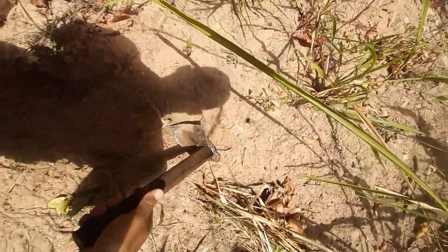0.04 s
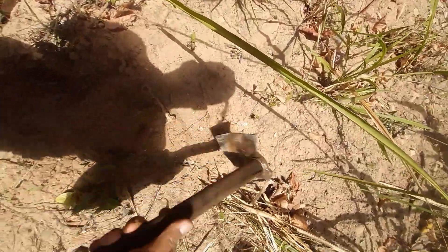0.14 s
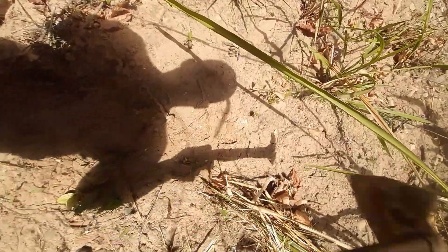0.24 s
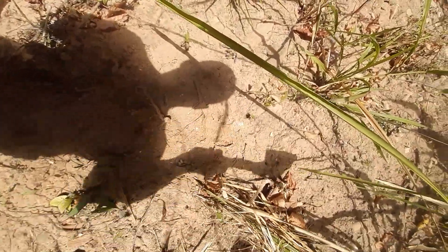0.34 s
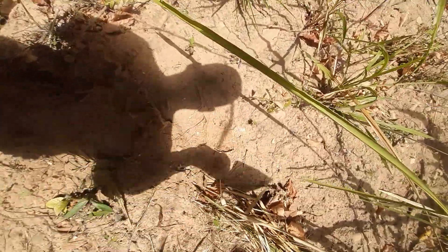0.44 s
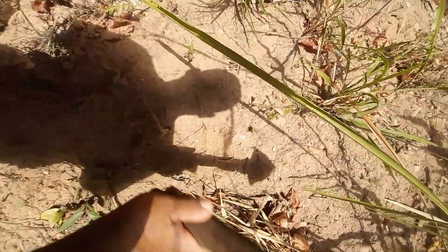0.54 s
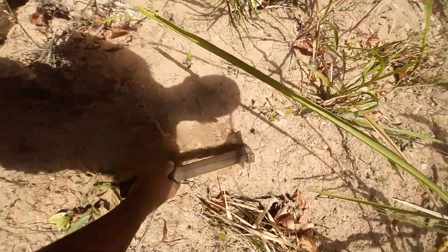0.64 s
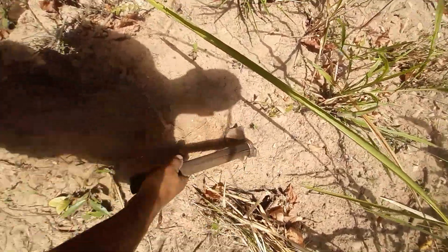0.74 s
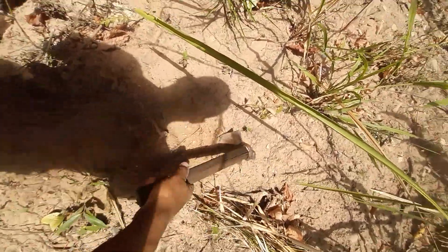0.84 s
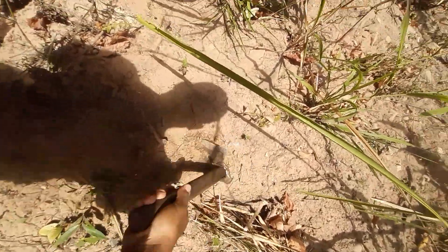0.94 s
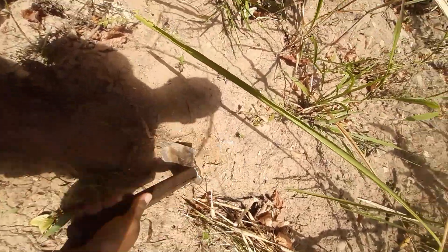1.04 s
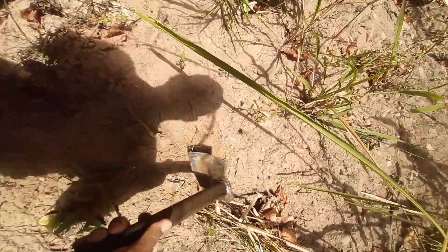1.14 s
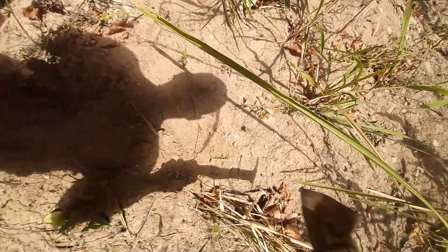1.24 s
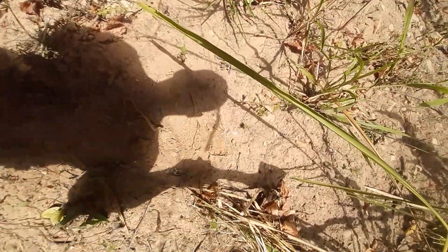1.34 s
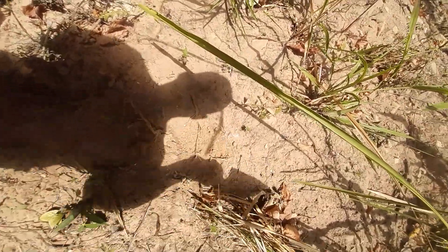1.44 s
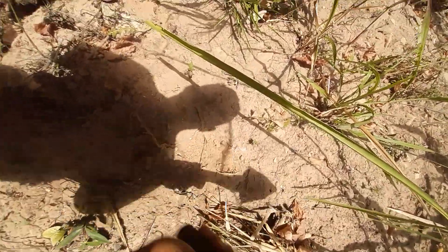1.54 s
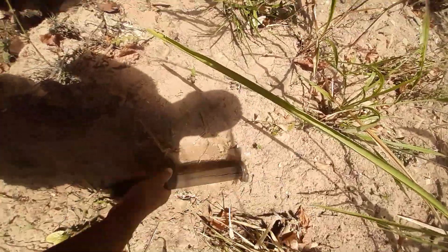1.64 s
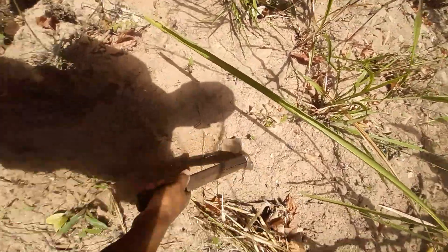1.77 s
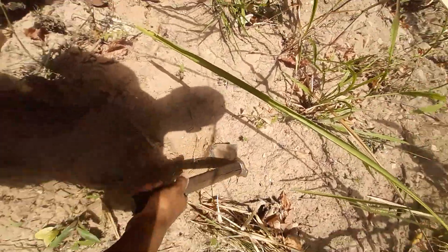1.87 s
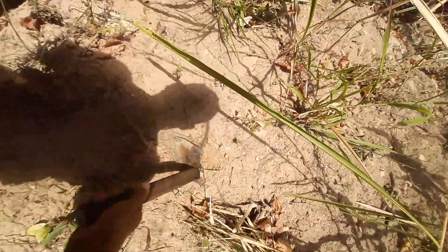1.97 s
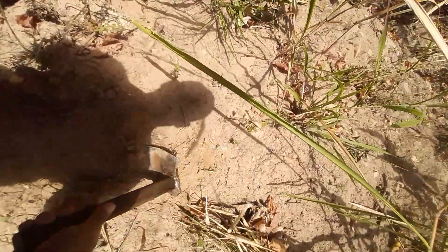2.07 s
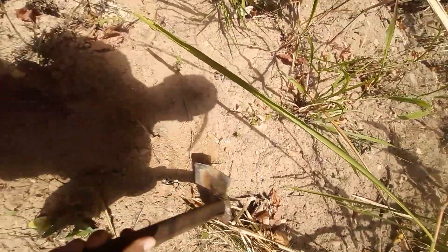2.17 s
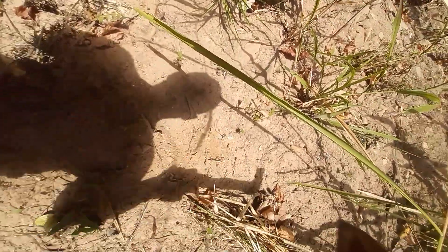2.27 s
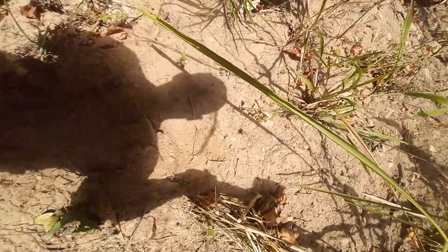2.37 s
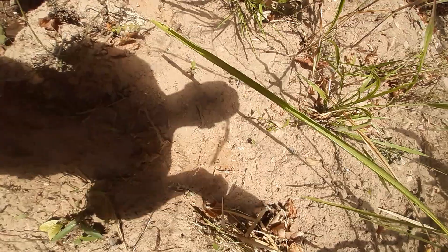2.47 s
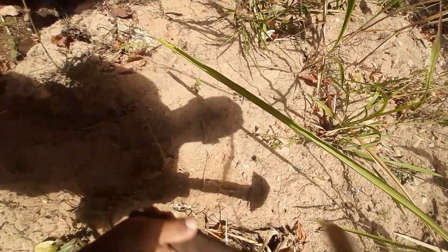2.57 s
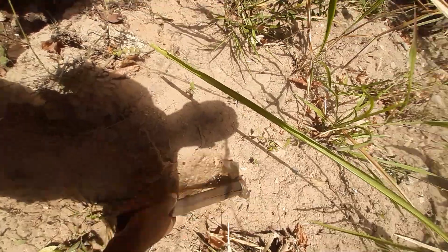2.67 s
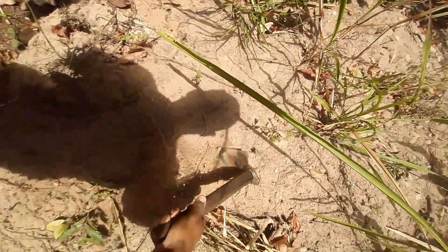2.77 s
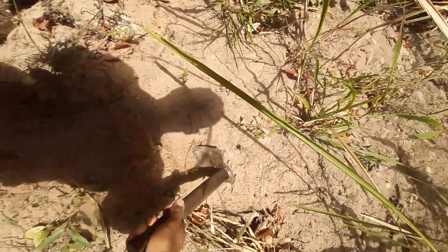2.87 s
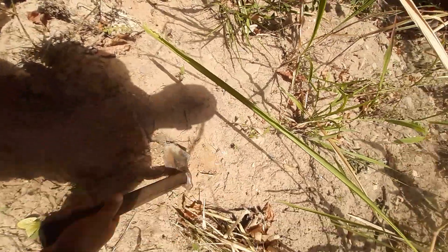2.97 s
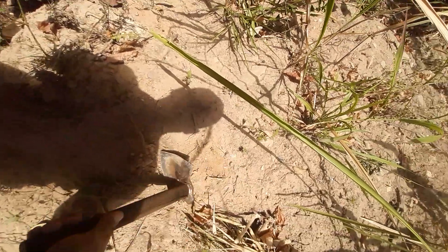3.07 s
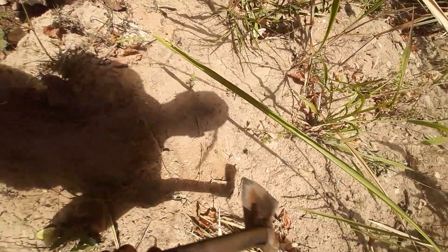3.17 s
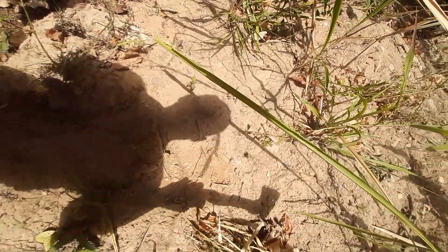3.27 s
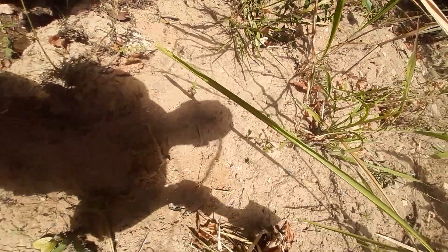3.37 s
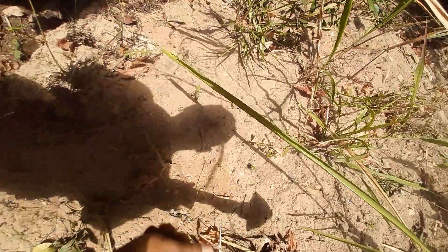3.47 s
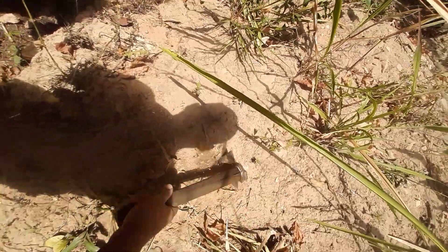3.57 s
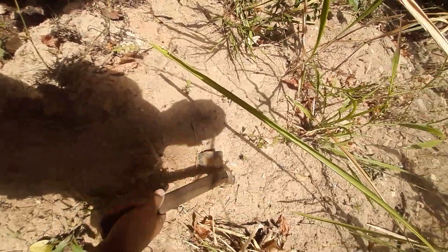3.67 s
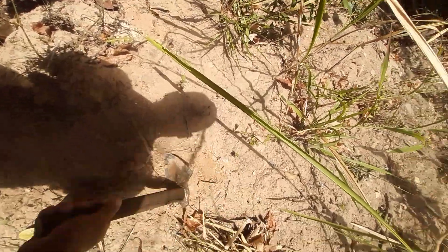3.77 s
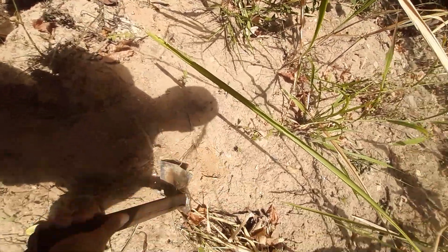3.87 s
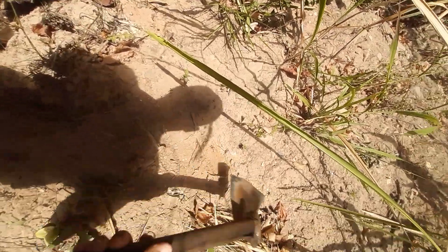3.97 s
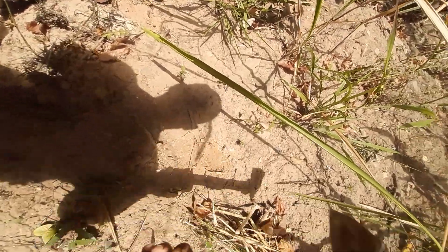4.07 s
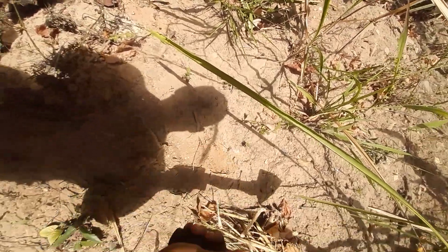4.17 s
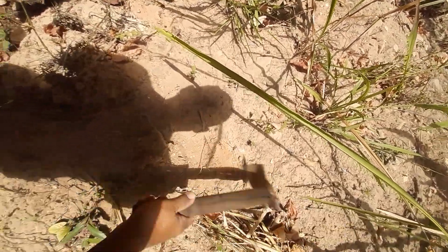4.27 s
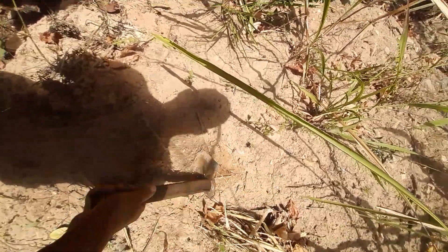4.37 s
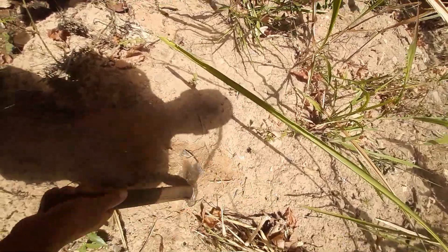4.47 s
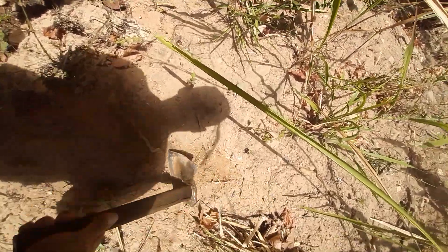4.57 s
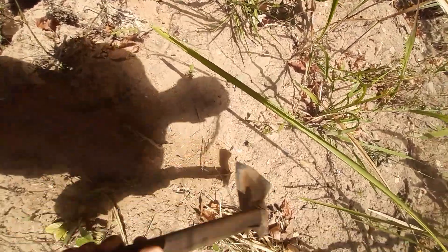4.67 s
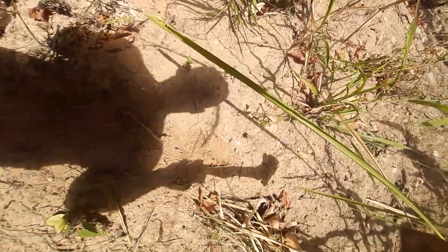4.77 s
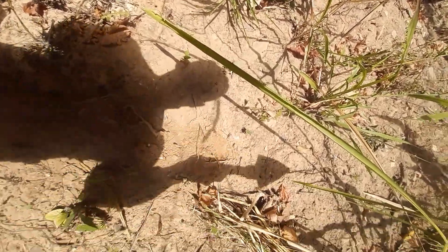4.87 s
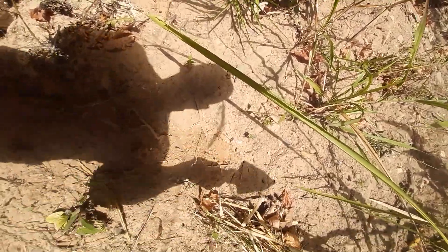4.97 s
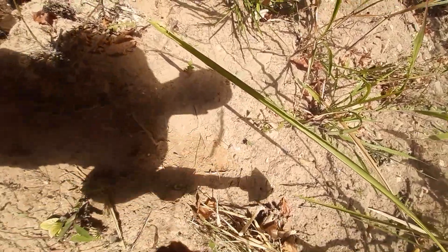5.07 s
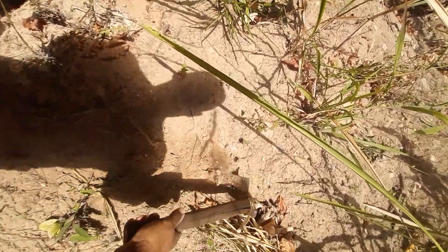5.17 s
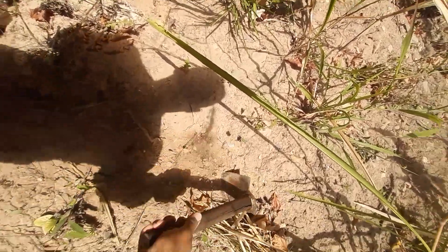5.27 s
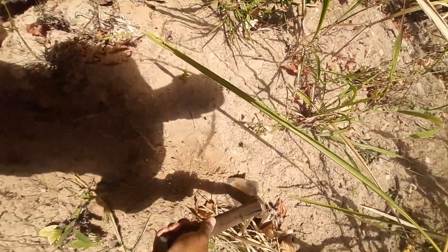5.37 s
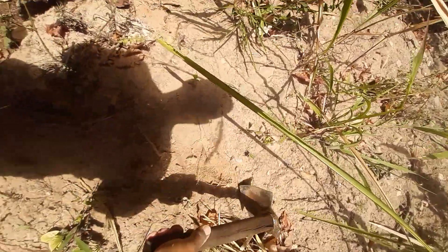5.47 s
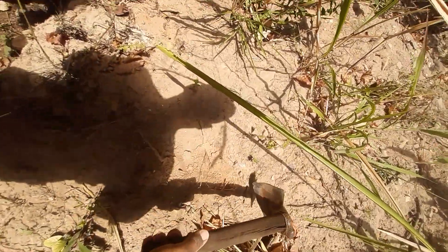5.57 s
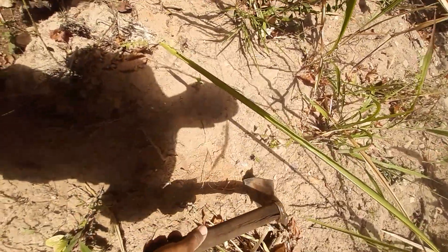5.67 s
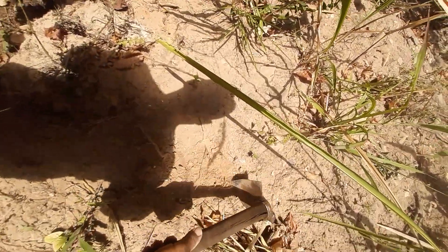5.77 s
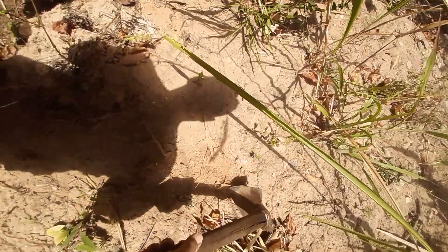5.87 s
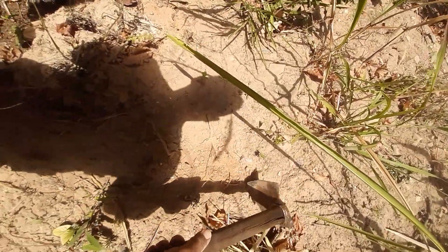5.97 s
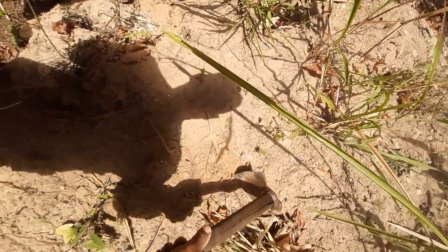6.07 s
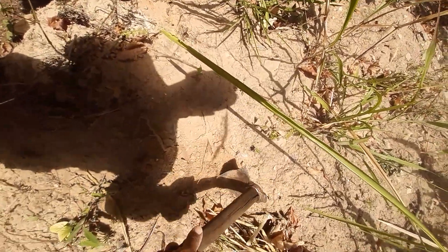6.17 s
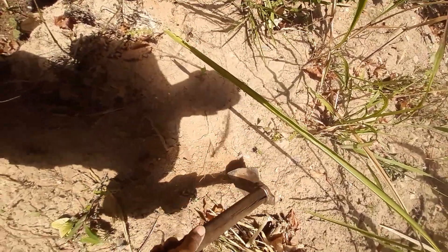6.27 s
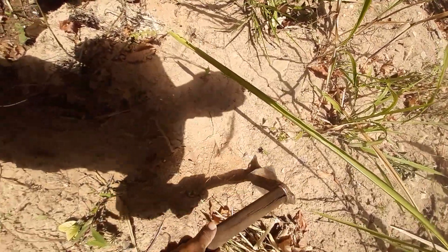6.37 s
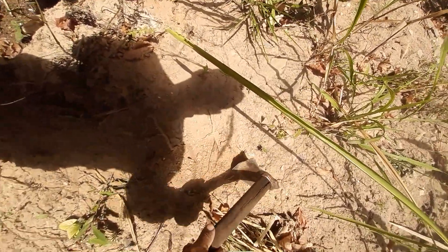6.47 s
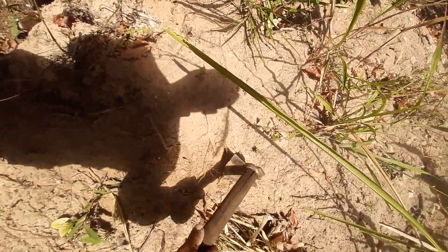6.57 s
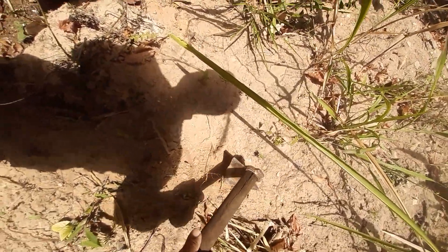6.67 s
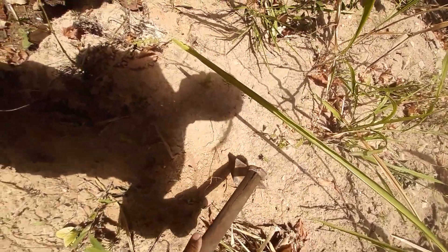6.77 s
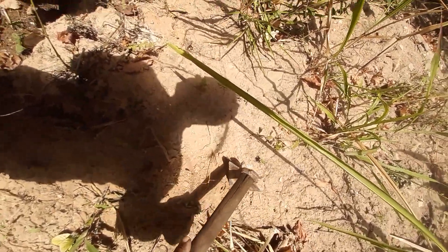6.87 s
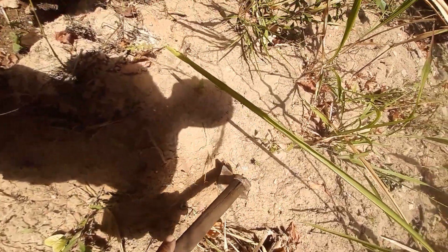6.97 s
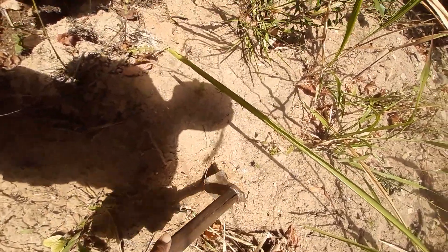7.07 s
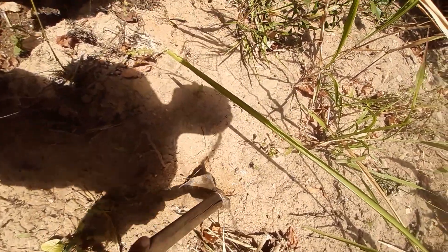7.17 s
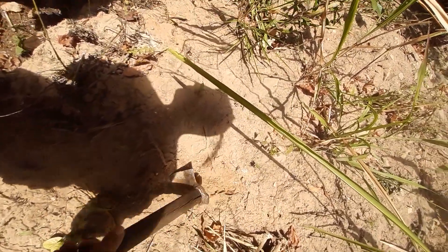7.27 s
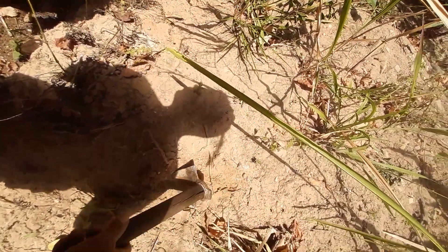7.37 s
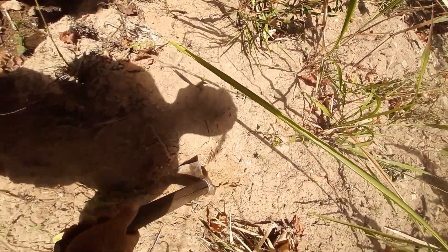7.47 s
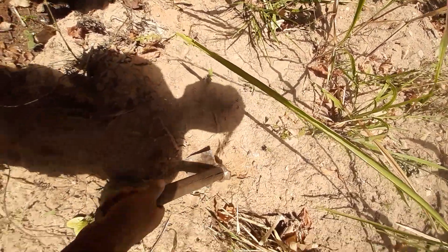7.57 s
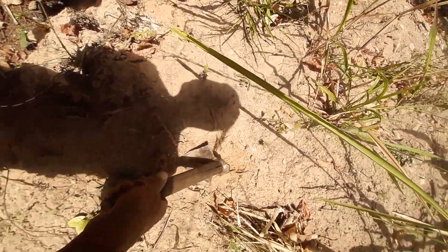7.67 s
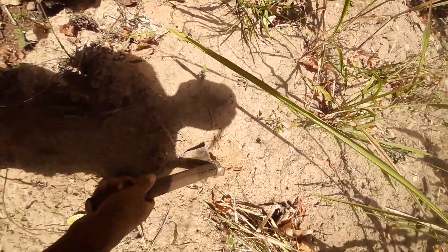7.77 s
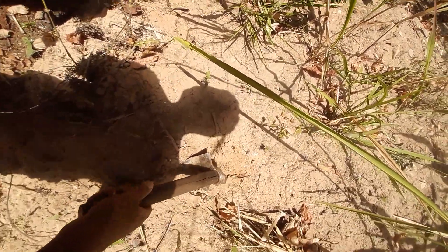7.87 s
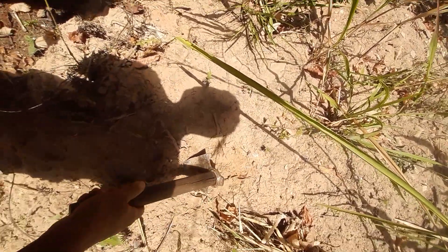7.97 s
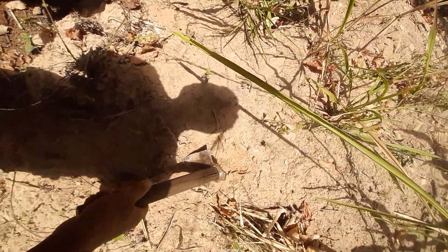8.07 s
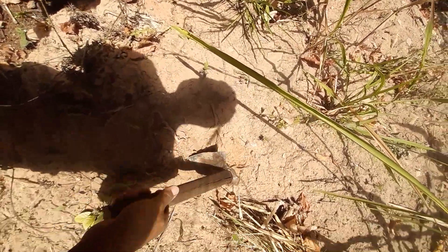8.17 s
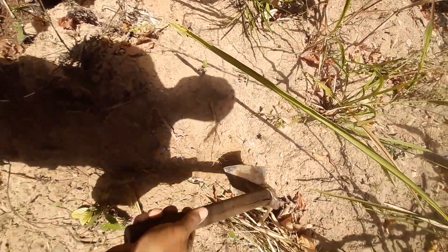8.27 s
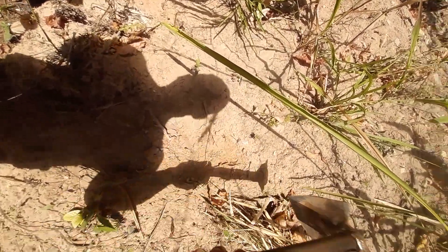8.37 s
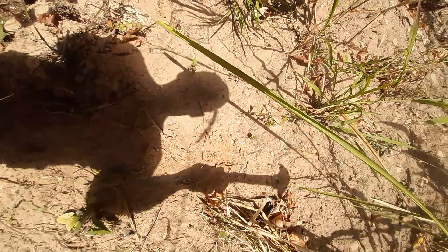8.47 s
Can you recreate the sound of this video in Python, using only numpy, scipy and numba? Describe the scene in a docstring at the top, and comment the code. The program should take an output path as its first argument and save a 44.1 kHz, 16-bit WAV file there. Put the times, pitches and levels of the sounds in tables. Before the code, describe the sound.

A steel hand hoe chops dry gravelly ground about once every half second, blade clinking and grit crunching, with loose stones pattering down outdoors.

```python
"""A steel hand hoe strikes almost at once over a faint outdoor murmur and low rumble, then chops, scrapes and taps on
dry gravelly ground. Each blow crunches grit (clicky noise), knocks soil (low noise) and rings the blade (decaying modes
that the soil damps). Drags feed the same layers unevenly; stones clack and thrown earth patters down between blows.
Low thuds are short decaying sines. Later, short puffs of air buffet the left port of the two-port microphone."""
import sys
import numpy as np
from scipy import signal
from scipy.fft import rfft, irfft
from scipy.io import wavfile
from scipy.ndimage import uniform_filter1d
from numba import njit

SR = 44100
rng = np.random.default_rng(int(sys.argv[2]) if len(sys.argv) > 2 else 0)


def wav_record(signal):
    """Record a signal, one row per channel, as 16-bit PCM in the file named by sys.argv[1]."""
    frames = np.transpose(np.atleast_2d(signal))
    bounded = np.clip(frames, -1, 1)
    # unit amplitude maps onto the largest positive 16-bit level
    quanta = np.round(bounded * 32767).astype(np.int16)
    wavfile.write(sys.argv[1], SR, quanta)


N = 375732


def undb(db):
    """Amplitude ratio of a level in dB."""
    return 10 ** (np.asarray(db) / 20)


def unit(x):
    """Scale to rms 1."""
    return x / np.sqrt(np.mean(x ** 2))


def sides(pan_db):
    """Left and right gains with the given left minus right dB; their mean is 1."""
    share = undb(pan_db) / (1 + undb(pan_db))
    return 2 * np.array([[share], [1 - share]])


def colour(x, table):
    """Causal filter with the given (Hz, dB) shape, from the cepstrum of the log gain."""
    size = 2048
    hz, db = np.transpose(table)
    bin_hz = np.arange(size // 2 + 1) * SR / size
    log_gain = np.interp(np.log(bin_hz + 1), np.log(hz), db) * np.log(10) / 20
    cepstrum = irfft(log_gain)
    # fold the cepstrum onto positive time: minimum phase
    cepstrum[1:size // 2] *= 2
    cepstrum[size // 2 + 1:] = 0
    return signal.oaconvolve(x, irfft(np.exp(rfft(cepstrum))))[:N]


def curves(table):
    """Interpolate each column over time; the first column is in seconds."""
    s, *columns = np.transpose(table)
    return [np.interp(np.arange(N) / SR, s, column) for column in columns]


def walk(rate_hz):
    """Random levels held 1 / rate_hz s and slewed twice; spread near 1."""
    hold = int(SR / rate_hz)
    steps = np.repeat(rng.standard_normal(N // hold + 1), hold)
    return 1.65 * uniform_filter1d(uniform_filter1d(steps, hold), hold)[:N]


def grains(table, share, scatter_db, own=0.):
    """Noise broken into uneven coloured clicks, a part (own) different at each port; rms 1."""
    size_db = scatter_db * np.minimum(rng.exponential(size=N), 4.5)
    size = (rng.random(N) < share) * undb(size_db)
    both, left = size * rng.standard_normal((2, N))
    own = np.clip(own, 0, 1)
    left_clicks = np.sqrt(1 - own) * both + np.sqrt(own) * left
    return np.array([unit(colour(x, table)) for x in (left_clicks, both)])


@njit
def ring(x, turn, loss, grip):
    """One mode as a rotating decaying phasor, with a loss that follows the grip."""
    y, z = np.empty(len(x)), 0j
    for i in range(len(x)):
        z = z * turn * (1 - loss * grip[i]) + x[i]
        y[i] = z.imag
    return y


# Murmur spectrum. Each row: frequency in Hz, density in dB per Hz.
AIR_SPECTRUM = [(71, -76), (120, -55), (223, -12), (350, -4.5), (663, -4.5), (1210, -7.5), (1390, -12),
                (1900, -8), (3450, -13), (6600, -21), (7700, -31), (15200, -31.5), (16500, -51)]
# Port balance of the murmur. Each row: frequency in Hz, left minus right in dB.
AIR_BALANCE = [(100, -5), (700, -2), (3000, -5.5), (15000, 14)]
AIR_DB = -54.5


def air():
    """Outdoor murmur: bass alike at both ports, treble unrelated; it swells a little."""
    shared = colour(rng.standard_normal(N), [(300, 3.5), (700, -11), (1500, -22.5)])
    balance_hz, balance_db = np.transpose(AIR_BALANCE)
    out = []
    for half in (.5, -.5):
        own = colour(rng.standard_normal(N), [(300, -6.5), (700, 1.5), (1500, 0.0)])
        spectrum = [(hz, db + half * np.interp(np.log(hz), np.log(balance_hz), balance_db))
                    for hz, db in AIR_SPECTRUM]
        out.append(colour(shared + own, spectrum))
    out = np.array(out)
    return out / np.std(out.mean(0)) * undb(AIR_DB + 1.6 * walk(3))


# Rumble spectrum. Each row: frequency in Hz, density in dB per Hz.
RUMBLE_SPECTRUM = [(25, -17), (45, -2), (60, 18), (75, -5), (120, -20)]
# Rumble swells. Each row: peak time in seconds, level in dB.
SWELLS = [(0.0, -67), (0.7, -63), (1.37, -65), (1.76, -66), (2.69, -52), (3.62, -60), (4.03, -79),
          (4.36, -62), (4.8, -53), (5.3, -61), (5.6, -67), (6.0, -72), (6.75, -60), (7.05, -61),
          (7.38, -69.5), (8.07, -68), (8.45, -59)]
SWELL_SIGMA_S, RUMBLE_FLOOR_DB = 0.052, -77


def rumble():
    """Wind on the microphone: faint low noise at both ports with bell-shaped swells."""
    t = np.arange(N) / SR
    swells = sum(undb(db) * np.exp(-((t - s) / SWELL_SIGMA_S) ** 2 / 2) for s, db in SWELLS)
    noise = unit(colour(rng.standard_normal(N), RUMBLE_SPECTRUM))
    return noise * (undb(RUMBLE_FLOOR_DB) + swells) * sides(-5.0)


# Blade meets ground. Each row: start in seconds, crunch in dB, then relative to it soil knock in dB,
# low blade ring in dB, high blade ring in dB; push in ms.
BLOWS = [(0.0177, -33, -29, 8, 1.5, 4.8), (0.644, -19.5, -0.5, 7.5, -9, 7.7),
         (0.897, -26.5, -22, 10.5, -11, 1.6), (0.9114, -36, -1, -17, 2.5, 4),
         (0.932, -35.5, -19, 13, -20, 1.7), (1.6587, -18.5, -3, 8, 2, 8.4),
         (1.73, -32, -3.5, 13, -19, 0.91), (1.8699, -21.5, -39, -31, -6.5, 0.54),
         (1.901, -27, -30, -9, 1, 1.2), (1.917, -30.5, -15, 2.5, -3, 5.9), (1.935, -36.5, -4.5, -2, 1, 4.1),
         (2.0097, -16.5, -11.5, 0, -11, 4.3), (2.659, -19, 2, 1, -14, 2.3),
         (2.978, -24.5, -2, -2.5, -8.5, 2.5), (3.119, -39, -12, -6, -13, 8.6),
         (3.5733, -21, -0.5, 8.5, -3, 0.87), (3.775, -32.5, 8.5, -13, 0, 2.4),
         (4.3241, -30.5, -1, 4, 1, 23), (4.3346, -23.5, -16, 17.5, 3, 0.42),
         (4.3483, -20.5, -10, 2, 0.5, 5.5), (4.403, -22, -17, -12, -6.5, 1.6),
         (4.426, -30, -4, -19, -13, 1.6), (4.449, -44.5, 8, -18, 10.5, 20), (4.4746, -43, 6.5, 7, 3, 16),
         (4.5111, -25.5, 2, -14, 3.5, 3.1), (5.1617, -17, 3, 7, -3, 4.8), (5.7471, -21.5, 3, 0, 4, 1.85),
         (5.911, -50, -19, -27, 16, 3.8), (6.1154, -29.5, 9, 12, 6.5, 9.7), (6.148, -27, 6, 7, -2, 1.9),
         (6.1651, -29.5, -16, 0, -27, 4.5), (6.485, -21.5, 2, 9.5, -2.5, 9.9),
         (6.5182, -16.5, -4, 5, -12.5, 3.4), (6.593, -43, -5, 16.5, -8, 15), (6.658, -40.5, -30, 8, 3, 3.2),
         (6.8108, -38, 6, 12.5, -14, 1.9), (6.8552, -40, -9, 7, -30, 1.4),
         (6.9145, -20.5, -13, 5, -14, 2.5), (6.929, -31.5, -29, 4, -24, 2.9), (6.977, -38, -6, 5, -26, 18),
         (7.002, -29, -10, 0.5, -32, 1.3), (7.3044, -44, -16, -17, -1, 13)]
# Landing stones and clods. Each row: start in seconds, level in dB, clack in Hz, treble in dB before
# the offset below, left minus right in dB.
STONES = [(0.0733, -22, 3800, -9, -6), (0.0925, -25, 3830, -20, -6), (0.131, -30.5, 4240, -10, -14),
          (0.1737, -22.5, 4100, -7, -9), (0.3333, -30, 4100, -6, -13), (0.3626, -40, 4270, -5, -8.0),
          (0.6968, -33, 1580, -18, -8), (0.7105, -18, 1570, -12, -13), (0.7774, -30, 5780, -18, -10.5),
          (0.8077, -30, 4370, -7, -7), (0.815, -28, 4850, -19, -14), (0.9666, -20.5, 1550, -16, -15),
          (0.9804, -20, 4530, -7, -10.0), (1.059, -12.5, 4700, -30, -4), (1.1184, -24.5, 6550, -15, -11.5),
          (1.1553, -25, 4610, -15, -9), (1.183, -30, 2580, -10, -11.0), (1.2081, -32, 2410, -21, -11.0),
          (1.2645, -38, 6550, -9, -9.0), (1.4245, -29, 4710, -6, -8), (1.614, -41, 2620, -7, -10.0),
          (1.684, -32, 1540, -18, -12.0), (1.754, -24.5, 1670, -10, -10), (1.7722, -37, 2740, -9, -12.5),
          (1.8404, -27.5, 6170, -7, -7), (1.8492, -22, 4980, -3, 2), (1.9804, -50, 4130, -4, -6.0),
          (2.1301, -37, 4680, 3, -12.5), (2.147, -35, 4650, -8, -12), (2.206, -17, 5210, -10, -2),
          (2.2241, -14.5, 5100, -7, -4), (2.369, -30, 2570, -7, -10), (2.4803, -23.5, 4250, -21, -8),
          (2.5955, -23, 2410, -34, 4), (2.775, -37, 2490, -10, -7.5), (2.8344, -45, 2550, -8, -8.0),
          (3.0614, -29, 4200, -6, -10.5), (3.1404, -25.5, 4130, -7, -11.5), (3.1622, -29, 4520, -4, -7),
          (3.2973, -33, 2490, -22, -5), (3.3508, -31, 3790, -9, -7), (3.4076, -27, 4030, -8, -9),
          (3.4334, -47, 2320, -12, -6.0), (3.5319, -44, 2720, -16, -10.0), (3.619, -33, 3870, -11, -11.0),
          (3.7403, -36, 2540, 0, -2), (3.8257, -18.5, 2550, -21, -13), (3.843, -25, 4140, -17, -11.5),
          (3.8886, -27, 5720, -19, -13.5), (3.9034, -36, 6250, -9, -9), (4.0123, -32, 5450, -10, -9),
          (4.079, -25.5, 4210, -13, -8.5), (4.1393, -25.5, 3870, -10, -11), (4.1586, -37, 5560, 4, -14),
          (4.2027, -27.5, 6640, -10, -11), (4.2491, -20, 3850, -20, -10), (4.7012, -41, 4930, -7, -11.0),
          (4.7365, -33.5, 3970, -15, -13), (4.7852, -24, 6800, -13, -11.0), (4.8073, -23, 4400, -8, -13.5),
          (4.8252, -14, 3920, -12, -0.5), (4.8798, -21.5, 3970, -20, -9), (4.9352, -20.5, 2220, -14, -12),
          (5.012, -31, 3900, -21, -16), (5.0825, -25, 2230, -7, -6), (5.1207, -34, 5180, -6, -10.0),
          (5.2485, -36, 6500, -1, -11.5), (5.4036, -29, 6300, -9, 0), (5.5022, -18, 5270, -10, 1),
          (5.5124, -26, 5350, -11, -3), (5.5204, -18, 5300, -7, -1), (5.5636, -21.5, 4760, -4, -4),
          (5.6053, -26, 5500, -13, -11.5), (5.651, -33, 5870, 0, -9.5), (5.678, -28.5, 7200, -6, -7),
          (5.7209, -34, 6300, 1, -4), (5.7894, -32, 6290, -16, -14), (5.8044, -39, 6280, -10, -10.0),
          (5.887, -23.5, 3950, -8, -7), (5.9853, -39, 1640, -14, -8.5), (6.0405, -17, 4000, -19, -4),
          (6.0988, -20.5, 2610, -11, 5), (6.2508, -28.5, 2600, -3, -1), (6.4094, -43, 2350, 4, -6.0),
          (6.4507, -42, 2700, -5, -5.5), (7.5782, -36, 2060, -11, -15)]
BLOW_TREBLE_DB, TREBLE_PER_RING, BLOW_PAN_DB = -2, 0.26, -1  # a brighter ring comes with finer grit
STONE_CRUNCH_DB, STONE_PUSH_MS = -9, 1.07
STONE_KNOCK_DB, STONE_RING_DB, STONE_FINE_DB = -24, -21, 6  # relative to the crunch


def contacts():
    """Blows and stones as columns: s, crunch, knock, low ring, high ring, treble, pan in dB, push ms."""
    blows = [(s, db, knock, low, high, BLOW_TREBLE_DB + TREBLE_PER_RING * high, BLOW_PAN_DB, ms)
             for s, db, knock, low, high, ms in BLOWS]
    stones = [(s, db + STONE_CRUNCH_DB, STONE_KNOCK_DB, STONE_RING_DB, STONE_RING_DB,
               fine_db + STONE_FINE_DB, pan_db, STONE_PUSH_MS) for s, db, _, fine_db, pan_db in STONES]
    return np.array(blows + stones).T


def pushes(db, tail_ms, free, late=0.):
    """Contact envelopes at both ports: quick rise, push while the blade cuts in, then decay."""
    out, t_ms = np.zeros((2, N + SR)), np.arange(SR // 20) / SR * 1e3
    start_s, *_, pan_db, push_ms = contacts()
    for s, pan, push, level_db in zip(start_s, pan_db, np.maximum(push_ms, .3), db):
        i = int(s * SR)
        rise = np.clip((t_ms - late * push) / 0.47, 0, 1)
        shape = rise * np.exp(-np.maximum(t_ms - push, 0) / tail_ms)
        # a free blade bounces off, so its push fades from the start
        shape *= np.exp(-2.5 * free[i] * (np.minimum(t_ms / push, 1) - .4))
        out[:, i:i + len(t_ms)] += undb(level_db) * sides(pan) * shape
    return out[:, :N]


# Hold on the blade, kept until the next row. Each row: start in seconds, share of its free decay time,
# drive of its two bending modes in dB.
GRIP = [(0, 0.33, 3), (.6, 0.16, 3.5), (.69, 0.11, 14), (.85, 0.27, 0.5), (1.6, 0.059, 0),
        (1.85, 0.21, 5.5), (2.0, 0.071, 4), (2.9, 0.23, 2.5), (3.5, 0.058, 1), (3.63, 0.25, -2),
        (4.3, 0.08, -2), (4.39, 0.26, 0), (5.1, 0.043, -9), (5.35, 0.26, 3), (6.1, 0.46, -10.5),
        (6.47, 0.49, -11), (6.515, 0.28, 0), (6.99, 0.3, 1), (7.25, 0.13, 5.5), (8.0, 0.37, -4)]


def hold():
    """Soil grip as a share of the free decay time, and the bending drive in dB, per sample."""
    s, free, bend_db = np.transpose(GRIP)
    row = np.searchsorted(s[1:] * SR, np.arange(N))
    return np.clip(free[row], .03, 1.5), bend_db[row]


# Blade and handle modes. Frequencies in Hz; each row of the partner table: level in dB, free t60 in seconds.
LOW_HZ, LOW_MODES = [2545, 2575, 2725], [(-3, 0.054), (4, 0.21), (-9, 0.4)]
BEND_HZ, BEND_MODES = [1330, 1552], [(-13.5, 0.33), (-6, 0.25)]
MID_HZ, MID_MODES = [4145, 4280, 6275, 6325], [(2, 0.29), (-13, 0.93), (-3, 0.39), (-3, 0.24)]
HIGH_HZ, HIGH_MODES = [8850, 9045, 11825, 11855, 14290, 15080, 15245, 15300, 15700], [(-16, 0.17), (-15, 0.26), (-10, 0.23), (4, 0.29), (-43.5, 0.32),
                                        (-21, .3), (1, 0.37), (-13, 0.23), (-30, .2)]
HANDLE_HZ, HANDLE_MODES = [292, 328], [(-1.3, 0.4), (-5.5, 0.21)]


def modes(drive, tones_hz, table, free, pan_db):
    """Every mode rings from the same rough contact; grip shortens its decay."""
    rough, grip = drive.mean(0) * rng.standard_normal(N), 1 / free
    out = np.zeros(N)
    for hz, (db, t60_s) in zip(tones_hz, table):
        out += undb(db) * ring(rough, np.exp(2j * np.pi * hz / SR), np.log(1000) / (t60_s * SR), grip)
    return sides(pan_db) * out


def blade_and_handle(free, bend_db, low_drag, mid_drag, high_drag, clod_drag):
    """Steel modes ring and the wooden handle flexes, driven by contacts and drags."""
    _, crunch_db, knock_db, low_db, high_db, _, _, push_ms = contacts()
    # a longer push feeds the same ring more gently; a gripped blade needs more drive for it
    feed_db = crunch_db - 10 * np.log10(np.maximum(push_ms, .3) + 2.5)
    slack = np.sqrt(free)
    low_drive = undb(-15.0) * pushes(feed_db + low_db, 1.4, free) + undb(-29) * low_drag / slack
    mid_drive = undb(-16.0) * pushes(feed_db + (low_db + high_db) / 2, 1.1, free)
    mid_drive += undb(-24) * mid_drag / slack
    high_drive = undb(-12.5) * pushes(feed_db + high_db, 0.92, free) + undb(-34.0) * high_drag / slack
    handle_drive = undb(-17.5) * pushes(feed_db + knock_db, 2.5, free) + undb(-19.5) * clod_drag
    low = modes(low_drive, LOW_HZ, LOW_MODES, free, 0.0)
    bend = modes(low_drive * undb(bend_db), BEND_HZ, BEND_MODES, free, -5.0)
    mid = modes(mid_drive, MID_HZ, MID_MODES, free, -0.5)
    high = modes(high_drive, HIGH_HZ, HIGH_MODES, free, -12.0)
    handle = modes(handle_drive, HANDLE_HZ, HANDLE_MODES, free, -2.5)
    return low + bend + mid + high + handle


# Coarse and fine grit spectra. Each row: frequency in Hz, density in dB per Hz.
GRIT_SPECTRUM, FINE_SPECTRUM = [(530, -31.5), (900, 6), (1360, -16.5), (2290, 5.5), (3340, 3), (4050, 8.5),
                                (5100, 6), (6680, 7.5), (7790, -8), (9000, -12.5), (11700, -13.5),
                                (19800, -120)], [(4410, -85), (7500, -15.5), (9080, -10.5), (12400, 2.5),
                                              (15100, 5), (16200, -4), (16500, -40.5)]
OWN_GRAINS = 1  # share of the grit that each port hears alone


def grit(free, loose, cluster, fine_db, grit_drag):
    """Gravel crunches under blows and drags and patters as it falls, in coarse and fine clicks."""
    _, crunch_db, _, _, _, treble_db, _, _ = contacts()
    coarse_gain = pushes(crunch_db + 0.83, 4.15, free) + grit_drag
    coarse_gain += loose * cluster * undb(2.7 * walk(76) - 1.5)
    fine_gain = pushes(crunch_db + treble_db + 1.3, 4.6, free) + undb(-9.0) * grit_drag
    fine_gain += loose * cluster * undb(fine_db + 1.5 * walk(70))
    coarse = grains(GRIT_SPECTRUM, .2, 3.23, OWN_GRAINS) * coarse_gain
    return coarse + grains(FINE_SPECTRUM, 0.2, 3.7, OWN_GRAINS) * fine_gain


# Soil spectrum. Each row: frequency in Hz, density in dB per Hz.
SOIL_SPECTRUM = [(88, -26.5), (150, -15), (377, 4), (699, 3.5), (1250, -6), (1640, -3.5), (2200, -10),
                 (2860, -11), (4840, -120)]


def soil_knock(free, loose, rumble_db, clod_drag):
    """Soil knocks hardest late in the push, then crumbles unevenly; falling clods rumble."""
    _, crunch_db, knock_db, *_ = contacts()
    level_db = crunch_db + knock_db
    gain = pushes(level_db + 0.224, 4.3, free, late=0.44)
    gain += pushes(level_db - 14, 14.2, free) * undb(4.0 * walk(120))
    gain += loose * undb(rumble_db + 2.0 * walk(40)) + clod_drag
    return grains(SOIL_SPECTRUM, 0.088, 3.93) * gain


# Blade dragged over gravel. Each row: start in seconds, length in seconds, low ring in dB, level change over
# the drag in dB, then relative to the low ring upper rings in dB before the offsets below, grit in dB,
# clod rumble in dB.
DRAGS = [(0.022, 0.041, -36, -11, -20, -22, -18), (0.685, 0.069, -44.5, -5, 3, 4.5, -7.5),
         (0.885, 0.12, -32.5, -14.5, -5, -7, -23), (1.693, 0.1, -43.5, 0.5, -4, -6, -7),
         (1.879, 0.071, -41, 6.5, -6.5, -4, -12), (2.017, 0.081, -51.5, -1, -12, -15, 8),
         (2.88, 0.11, -57.5, 9, 10.5, -2, -39), (2.982, 0.15, -41, -23, 4.5, -2, -16),
         (3.64, 0.15, -51.5, 2.5, 3, -11, -20), (3.758, 0.12, -45.5, -4.5, 9.5, 7.5, -6.5),
         (4.347, 0.076, -37, -11, -12, -1, -8), (4.41, 0.17, -41, -16.5, 7, -9, -1.5),
         (5.165, 0.055, -51, -14.5, 2, 11, 17.5), (5.4, 0.041, -52, -23, 19, -16, 4),
         (5.746, 0.18, -38, -16.5, 8, -3.5, -15), (6.167, 0.097, -38.5, -21, 2.5, -1, -6),
         (6.52, 0.2, -34, -19.5, 3, -4, -15), (6.801, 0.061, -49, -22, 12.5, -9, -1.5),
         (6.925, 0.18, -31.5, -21, -1.5, -9, -16.5), (7.299, 0.04, -44.5, 4.5, 11, 1.5, -3.5),
         (7.809, 0.048, -65.5, -4, 8.5, -3, -6), (8.126, 0.092, -60.5, -2.5, 8.5, -6, -8)]
DRAG_MID_DB, DRAG_HIGH_DB = -8.5, -4


def drags():
    """Gains of low, middle and high ring, grit and clods, roughened as the edge catches and slips."""
    out = np.zeros((5, N))
    for s, length_s, db, fade_db, upper_db, grit_db, clod_db in DRAGS:
        i, fade = int(s * SR), np.linspace(0, fade_db, int(length_s * SR))
        layers_db = np.array([0, upper_db + DRAG_MID_DB, upper_db + DRAG_HIGH_DB, grit_db, clod_db])
        out[:, i:i + len(fade)] = undb(db + fade + layers_db[:, None])
    return uniform_filter1d(out, size=200, axis=1) * undb(4.71 * walk(90))


CLACK_DB, CLACK_DECAY_CYCLES = -5.5, 7.4


def clacks():
    """Each landing stone clacks for a few cycles at its own pitch."""
    out, t = np.zeros((2, N + SR)), np.arange(SR // 50) / SR
    for s, db, hz, _, pan_db in STONES:
        i = int(s * SR)
        clack = np.sin(2 * np.pi * hz * t) * np.exp(-hz * t / CLACK_DECAY_CYCLES)
        out[:, i:i + len(t)] += sides(pan_db) * undb(db + CLACK_DB) * clack
    return out[:, :N]


# Clack frequencies in Hz of the gravel sizes.
PEBBLE_HZ = [1500, 2200, 3000, 4300, 5200, 6400, 11500, 13500]


def pebbles(scatter_db, cycles, count):
    """Single stones land at random, each size with a short clack; each port hears its own; rms 1."""
    out, still = np.zeros((2, N)), np.ones(N)
    for hz in PEBBLE_HZ:
        for port in out:
            hits = np.zeros(N)
            size_db = scatter_db * np.minimum(rng.exponential(size=count), 4.5)
            hits[rng.integers(0, N, count)] = undb(size_db)
            port += ring(hits, np.exp(2j * np.pi * hz / SR), hz / (cycles * SR), still) * np.sqrt(hz)
    return unit(out)


# Loose earth falling, interpolated. Each row: time in seconds, patter in dB, then relative to it clod rumble
# in dB, treble in dB.
EARTH = [(0.09, -41, -7.5, 0), (0.45, -55.5, 1, -1), (0.9, -39, -8.5, -2), (1.19, -42, -14, -2),
         (1.5, -54.5, -5, 0), (1.7, -49.5, -7, 0), (2.09, -37.5, -12.5, -2), (2.61, -44.5, -9.5, -1.5),
         (3.2, -53, -21, -0.5), (3.66, -59.5, -28, 5), (3.96, -41, -18.5, -0.5), (4.25, -49.5, -9, -3.5),
         (4.55, -37.5, -11, 2), (5.22, -46.5, -5, -3), (5.74, -44.5, -5.5, -1.5), (6.05, -53.5, 1, -3),
         (6.57, -57.5, 5.5, -4), (6.75, -65, 12, -10), (6.95, -48, 0, -9), (7.2, -61, 7, -1),
         (8.52, -61.5, 14, -7)]


def earth():
    """Patter gain at both ports, bunching of its grains, clod and treble levels in dB."""
    patter_db, rumble_db, fine_db = curves(EARTH)
    return undb(patter_db) * sides(-1.0), undb(1.3 * walk(25)), rumble_db, fine_db


def hoe():
    """Blows, drags and the earth they loosen."""
    free, bend_db = hold()
    loose, cluster, rumble_db, fine_db = earth()
    low_drag, mid_drag, high_drag, grit_drag, clod_drag = drags()[:, None] * sides(5.0)
    rings = blade_and_handle(free, bend_db, low_drag, mid_drag, high_drag, clod_drag)
    crunch = grit(free, loose, cluster, fine_db, grit_drag)
    knock = soil_knock(free, loose, rumble_db, clod_drag)
    pebble_gain = undb(-5.5) * loose * cluster + undb(-1.5) * grit_drag
    return rings + crunch + knock + clacks() + pebbles(5.3, 1.85, count=600) * pebble_gain


# Left port, shaded by the housing. Each row: frequency in Hz, gain in dB.
SHADE = [(100, -13.5), (350, -3.5), (600, -12), (1000, -0.5), (2500, -10.5), (5300, -10.5), (7000, -12.5),
         (9000, 5.5), (11000, -7), (13500, -9.5), (15500, -52)]


def ports(x):
    """The far port hears the treble round the housing: coloured and smeared over several paths."""
    left, right = signal.sosfilt(signal.butter(2, 90, "high", fs=SR, output="sos"), x)
    left = colour(left, SHADE)
    bass = signal.sosfiltfilt(signal.butter(2, 2500, fs=SR, output="sos"), left)
    treble = left - bass
    for lag in (5, 11, 23):  # all-pass delays in samples
        taps = np.r_[.5, np.zeros(lag - 1), 1]
        treble = signal.lfilter(taps, taps[::-1], treble)
    return np.array([bass + treble, right])


# Low thuds. Each row: start in seconds, level in dB, pitch in Hz, hardness in dB per octave.
THUDS = [(0.651, -35, 163, 0.5), (1.667, -42.5, 140.6, 17), (2.027, -45.5, 166, 13),
         (2.661, -14.5, 100.3, -2), (2.754, -47, 131, 1.5), (3.575, -26.5, 115, 4), (4.337, -44, 133, -7),
         (5.165, -34.5, 124.4, 10.5), (5.746, -46, 153, 1.5), (6.119, -38, 142, -5), (6.486, -58, 132, 19)]
# Thud modes. Each row: multiple of the pitch, level in dB, t60 in seconds.
THUD_MODES = [(0.53, -22, 0.3), (1.011, -8.7, 0.15), (2.2, 6.5, 0.025), (3.1, -10, 0.058), (5.6, -14, 0.016)]
THUD_PAN_DB = -16


def thuds():
    """Each thud is a short low swing; a harder thud favours its upper modes."""
    out, t = np.zeros(N + SR), np.arange(SR // 3) / SR
    for s, db, hz, tilt_db in THUDS:
        i = int(s * SR)
        for times, mode_db, t60_s in THUD_MODES:
            swing = np.sin(2 * np.pi * hz * times * t) * np.exp(-np.log(1000) * t / t60_s)
            out[i:i + len(t)] += undb(db + mode_db + tilt_db * np.log2(times)) * swing
    return sides(THUD_PAN_DB) * out[:N]


# Puffs of air. Each row: start in seconds, length in seconds, level in dB.
PUFFS = [(4.697, 0.13, -45.5), (6.663, 0.027, -44.5), (6.722, 0.042, -45), (6.907, 0.05, -51),
         (7.002, 0.04, -54)]
# Puff spectrum. Each row: frequency in Hz, density in dB per Hz.
GUST_SPECTRUM = [(25, -23), (50, -10), (100, 12.5), (160, -4), (300, -49)]
PUFF_PAN_DB = 43


def puffs():
    """Short bursts of low noise buffet the left port."""
    t = np.arange(N) / SR
    gust = sum(undb(db) * (t > s) * (t < s + length_s) for s, length_s, db in PUFFS)
    noise = unit(colour(rng.standard_normal(N), GUST_SPECTRUM))
    return sides(PUFF_PAN_DB) * uniform_filter1d(gust, size=600) * noise


def scene():
    """Murmur and wind under the hoe, with low thuds."""
    return air() + rumble() + ports(hoe()) + thuds() + puffs()


TOP_HZ = 15900


def record(dry):
    """The microphone drops the deepest bass and dips near 3.3 kHz; the loudest peaks clip;
    nothing sounds above TOP_HZ."""
    dry = signal.sosfilt(signal.butter(4, 36, "high", fs=SR, output="sos"), dry)
    dry = dry - 0.5 * signal.lfilter(*signal.iirpeak(3330, 6.5, fs=SR), dry)
    clipped = np.clip(dry, -.85, .85)
    return signal.sosfilt(signal.ellip(8, .2, 80, TOP_HZ, fs=SR, output="sos"), clipped)


dry = scene()
out = record(dry)
wav_record(out)
```